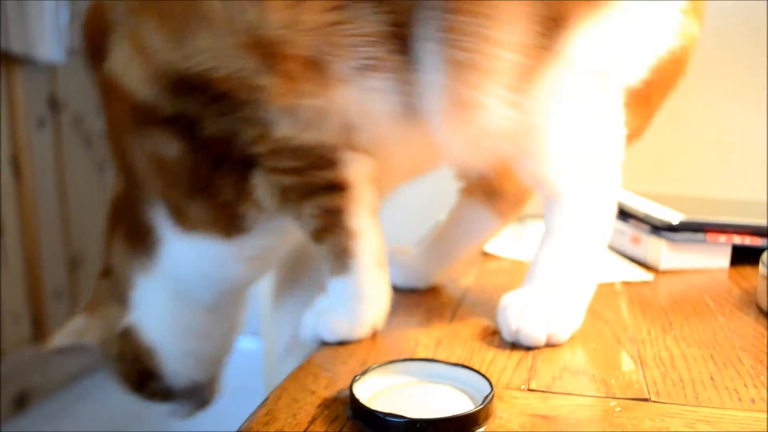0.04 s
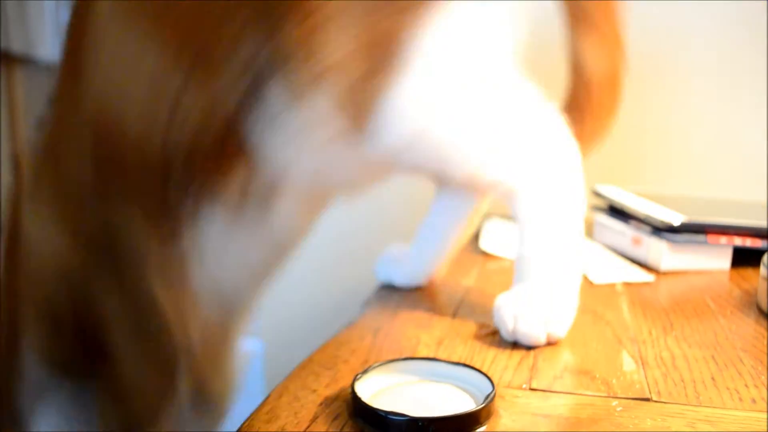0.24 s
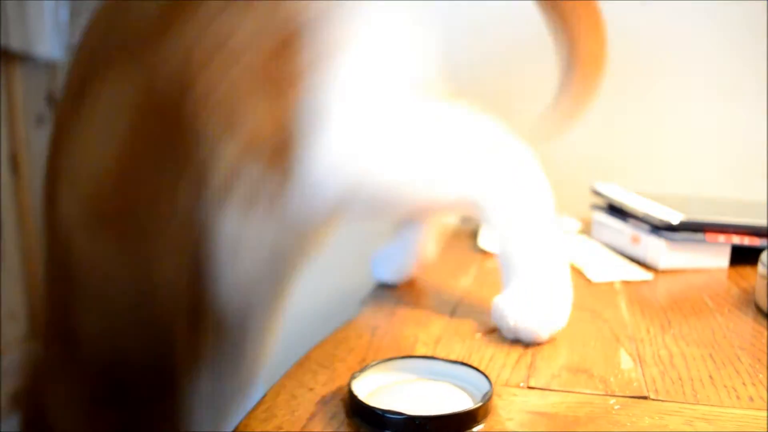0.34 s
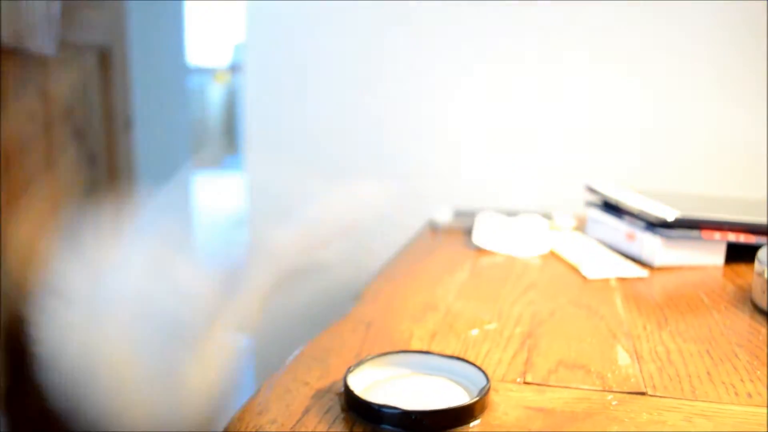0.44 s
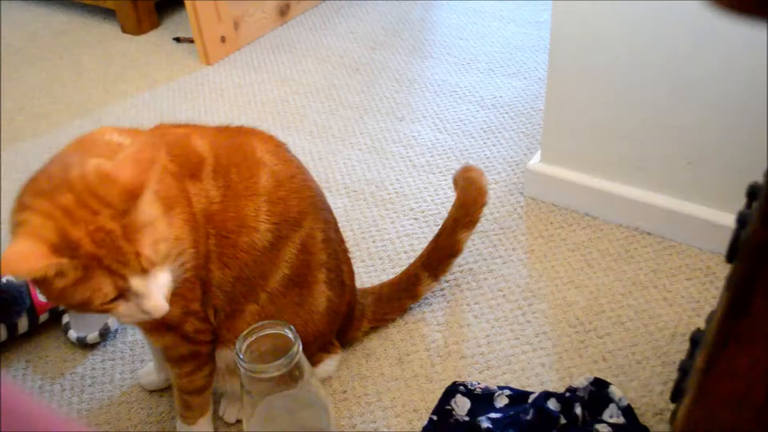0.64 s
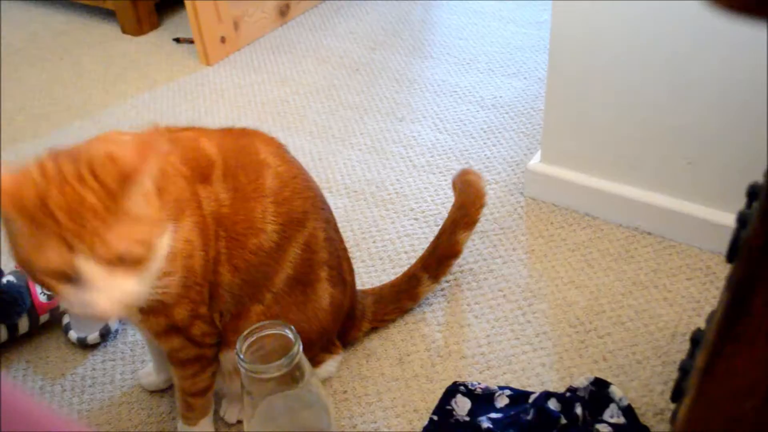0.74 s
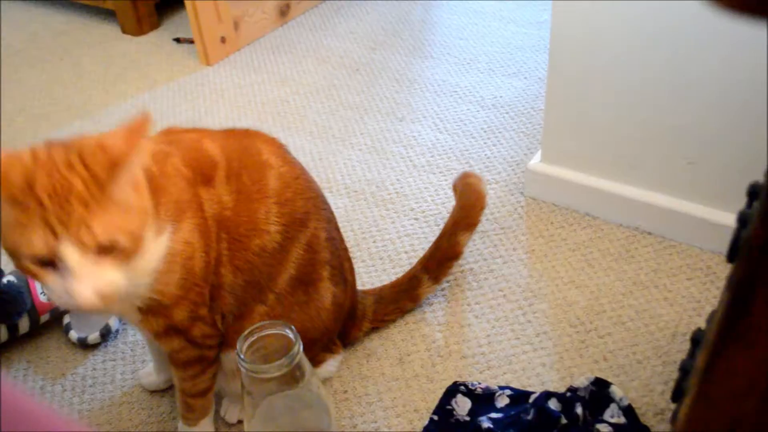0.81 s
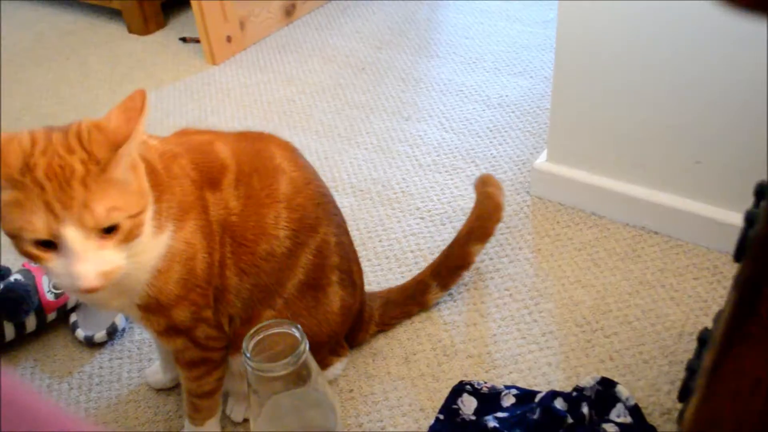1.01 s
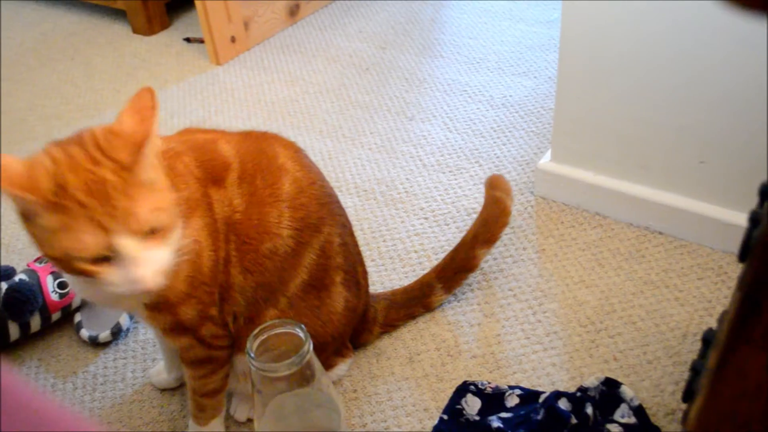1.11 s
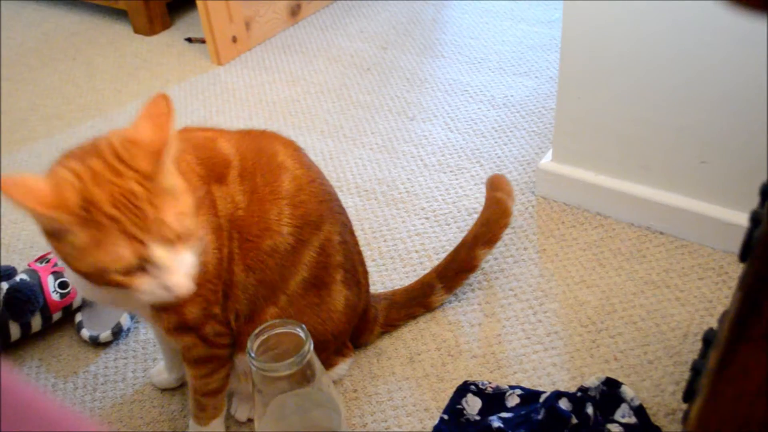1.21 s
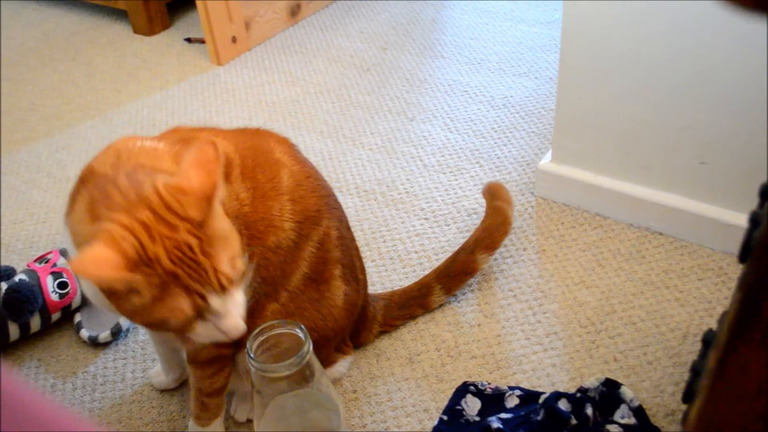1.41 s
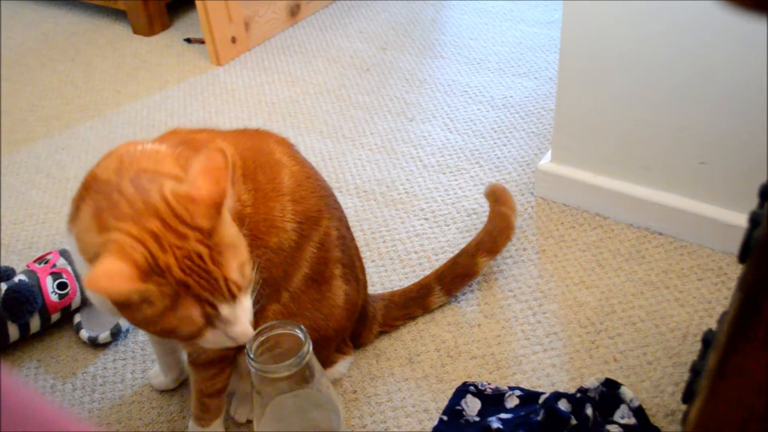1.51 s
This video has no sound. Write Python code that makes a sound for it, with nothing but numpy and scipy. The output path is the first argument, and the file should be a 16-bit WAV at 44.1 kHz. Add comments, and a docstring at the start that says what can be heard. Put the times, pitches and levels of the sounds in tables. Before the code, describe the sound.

A single sharp knock on a wooden table comes first, close to the microphone. Then a cat's paws thump softly as it steps down, with faint claw ticks and scuffing over the hiss of a quiet room.

```python
"""In a quiet room, a cat steps off a wooden table.
The table gives one dry knock, the impulse response of its damped modes, with brief reflections.
Claws tick in short noise bursts, soft paws thump in a few low cycles, and fur and paws scuff
faintly by friction. Room hiss and a thin electronic whine run underneath.
Just after the last thump, all sound drops out briefly."""
import sys
import numpy as np
from scipy import signal
from scipy.fft import rfft, irfft
from scipy.io import wavfile
from scipy.ndimage import uniform_filter1d

SR = 44100
rng = np.random.default_rng(int(sys.argv[2]) if len(sys.argv) > 2 else 0)


def store_pcm(level_fs):
    """Save levels as 16-bit WAV."""
    pcm = np.round(np.clip(level_fs, -1, 1) * 32767).astype(np.int16)
    wavfile.write(sys.argv[1], SR, np.atleast_2d(pcm).T)


N = 68355
TIME = np.arange(N) / SR


def amp(db):
    """Amplitude ratio: a factor of ten for every 20 dB."""
    return 10 ** (np.asarray(db) / 20)


def coloured(x, spectrum):
    """Spectral shaping: x is filtered by a (frequency, level) curve, then scaled to unit rms."""
    hz, db = np.transpose(spectrum)
    bin_hz = np.fft.rfftfreq(N, 1 / SR)
    gain = amp(np.interp(np.log(bin_hz + 1), np.log(hz), db))
    shaped = irfft(rfft(x) * gain, N)
    return shaped / np.sqrt(np.mean(shaped ** 2) + 1e-20)


def noise(spectrum):
    """Filtered white noise takes on the spectrum of its filter."""
    return coloured(rng.standard_normal(N), spectrum)


def envelope(start, rise, t60):
    """Exponential decay, 60 dB in t60 seconds, with a smooth onset."""
    age = np.maximum(TIME - start, 0)
    return (1 - np.exp(-(age / rise) ** 2)) * np.exp(-np.log(1000) * age / t60)


def mode(start, hz, rise, t60):
    """Free vibration of a damped oscillator: a decaying sinusoid."""
    return envelope(start, rise, t60) * np.sin(2 * np.pi * hz * (TIME - start))


# Spectrum of the room noise: (frequency [Hz], relative spectral level [dB])
HISS_SPECTRUM = [(15, -32.5), (28, -12), (55, 0), (97, -2.5), (145, -9), (230, -5.5), (340, -8.5),
                 (600, -7), (1000, -8), (1600, -14), (2150, -12), (2600, -19.5), (4000, -24.5), (6000, -35),
                 (10000, -39), (15000, -41.5)]
HISS_DB, WHINE_DB = -60, -76.5
WHINE_HZ, WHINE_DEPTH = 15679, 0.08

def hiss_and_whine():
    """Stationary room noise, and an electronic tone wavering by random amplitude modulation."""
    waver = 1 + WHINE_DEPTH * noise([(5, -5.5), (30, -7), (300, -75)])
    whine = np.sqrt(2) * waver * np.sin(2 * np.pi * WHINE_HZ * TIME)
    return amp(HISS_DB) * noise(HISS_SPECTRUM) + amp(WHINE_DB) * whine


# A light touch on the table, then the full contact: (time [s], level [dB])
CONTACTS = [(0.2115, -22), (0.213, 1)]
# Wood modes, the strong ones heavily damped: (frequency [Hz], relative level [dB], T60 [s])
WOOD_MODES = [(547, -12, 0.0062), (749, -47.5, 0.051), (934, 1.5, 0.0038), (1160, -40, 0.021),
              (1693, 3, 0.0023), (1860, -45, .028), (2124, -40.5, 0.047), (2968, -8, 0.0033),
              (3703, 0.9, 0.0024), (4150, -38, 0.013), (5150, -47.5, .016), (6690, -23, 0.0035),
              (9640, -19.5, 0.0018), (13300, -22.5, .0013)]
# Spectrum of the early reflections: (frequency [Hz], relative spectral level [dB])
REFLECTION_SPECTRUM = [(60, -6), (150, 6), (800, 5.5), (1500, -7.5), (2300, 0), (3200, -26.5), (5000, -24),
                       (7000, -37.5), (15000, -59.5)]
CONTACT_RISE_S = 0.00057  # how fast the contact force builds
REFLECTION_GAIN_DB, REFLECTION_DELAY_S = -36, 0.004

def knock():
    """Modal excitation: each contact sets the wood vibrating, and the room reflects it briefly."""
    out = np.zeros(N)
    for start, db in CONTACTS:
        wood = sum(amp(mode_db) * mode(start, hz, CONTACT_RISE_S, t60)
                   for hz, mode_db, t60 in WOOD_MODES)
        decay = envelope(start + REFLECTION_DELAY_S, rise=0.0016, t60=0.039)
        reflections = amp(REFLECTION_GAIN_DB) * noise(REFLECTION_SPECTRUM) * decay
        out += amp(db) * (reflections - wood)
    return out


# Claw contacts: (time [s], level [dB])
CLAW_TICKS = [(0.3356, -51), (0.37, -50), (0.4785, -45), (0.489, -61), (0.5705, -59)]
# Spectrum of a tick: (frequency [Hz], relative spectral level [dB])
CLAW_SPECTRUM = [(200, 2), (1600, 6.5), (2800, -2.5), (4500, -12.5), (6000, -20), (9000, -21.5),
                 (15000, -33)]

def claws():
    """A short impact has a broad spectrum: each claw tick is a bright burst of noise."""
    bursts = sum(amp(db) * envelope(start, rise=0.0002, t60=0.013) for start, db in CLAW_TICKS)
    return noise(CLAW_SPECTRUM) * bursts


# Paw impacts: (time [s], level [dB], frequency [Hz], rise time [s], T60 [s], brush level [dB])
PAW_THUMPS = [(0.3566, -35.5, 207.7, 0.0029, 0.1, -48.5), (0.3758, -32.5, 71, 0.0019, 0.075, -66),
              (0.3805, -27, 158, 0.0036, 0.058, -71), (0.3818, -36, 263, 0.0032, 0.037, -70),
              (.407, -35.5, 133.5, 0.0064, 0.072, -52), (0.4286, -39, 176, 0.0019, 0.045, -66.5),
              (0.6159, -25.5, 133, .012, 0.053, -52)]
# Spectrum of a brushing pad: (frequency [Hz], relative spectral level [dB])
PAD_SPECTRUM = [(30, -9), (250, 1), (450, -4.5), (1050, -10.5), (1800, -14.5), (5000, -40.5), (15000, -47)]

def paws():
    """A soft impact excites low frequencies: a few damped cycles, with a dull brush of the pad."""
    pad = noise(PAD_SPECTRUM)
    out = np.zeros(N)
    for start, db, hz, rise, t60, brush_db in PAW_THUMPS:
        thump = amp(db) * mode(start, hz, rise, t60)
        brush = amp(brush_db) * pad * envelope(start, rise=0.0037, t60=0.14)
        out += thump + brush
    return out


# Sliding movements of fur and paws: (time [s], level [dB], rise time [s], T60 [s])
SLIDES = [(0.466, -51, 0.013, 0.29), (0.546, -49, 0.027, 0.41)]
# Spectrum of the friction: (frequency [Hz], relative spectral level [dB])
FRICTION_SPECTRUM = [(40, -13), (170, 6), (450, -1), (1200, -3.5), (2000, 1), (2700, -2), (3400, -17.5),
                     (5500, -28), (15000, -43)]
GRAINS_PER_S, GRAIN_SPREAD_DB = 7000, 1.5

def scuffs():
    """Friction noise: dense random impulses swell and fade with each movement."""
    spread_db = GRAIN_SPREAD_DB * np.minimum(rng.exponential(1, N), 4)
    sizes = amp(spread_db) * rng.standard_normal(N)
    grains = sizes * (rng.random(N) < GRAINS_PER_S / SR)
    movement = sum(amp(db) * envelope(start, rise, t60) for start, db, rise, t60 in SLIDES)
    return coloured(grains, FRICTION_SPECTRUM) * movement


def scene():
    """Superposition: the sources add in one channel."""
    return (knock() + paws() + scuffs() + claws() + hiss_and_whine())[None]


DROP_S, MUTE_S, RETURN_S = 0.6595, 0.71, 0.7255
DROP_DB, CUTOFF_HZ = -29, 16400

def record(dry):
    """Gating and band limiting: the sound drops, is muted and returns, all through a low-pass."""
    gate = np.select([TIME < DROP_S, TIME < MUTE_S, TIME < RETURN_S], [1, amp(DROP_DB), 0], 1)
    gated = dry * uniform_filter1d(gate, size=40)
    low_pass = signal.firwin(511, CUTOFF_HZ, window=("kaiser", 9), fs=SR)
    return signal.oaconvolve(gated, low_pass[None], "same")


dry = scene()
out = record(dry)
store_pcm(out)
```